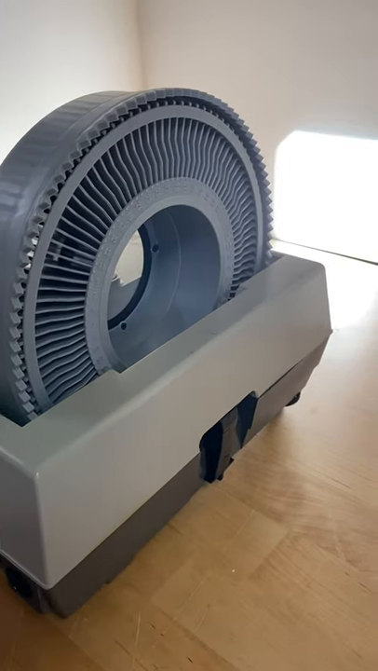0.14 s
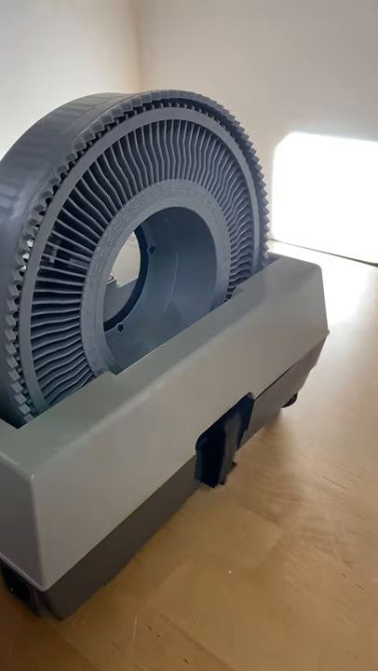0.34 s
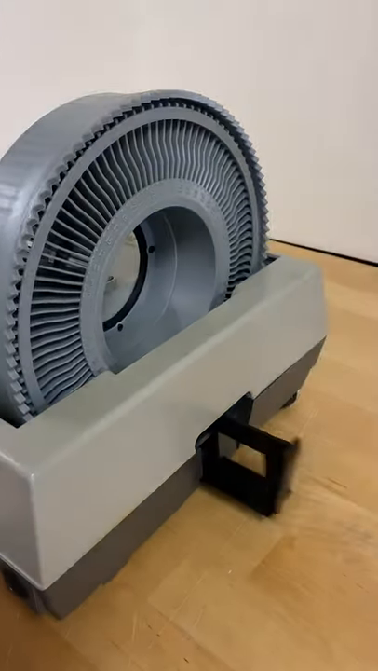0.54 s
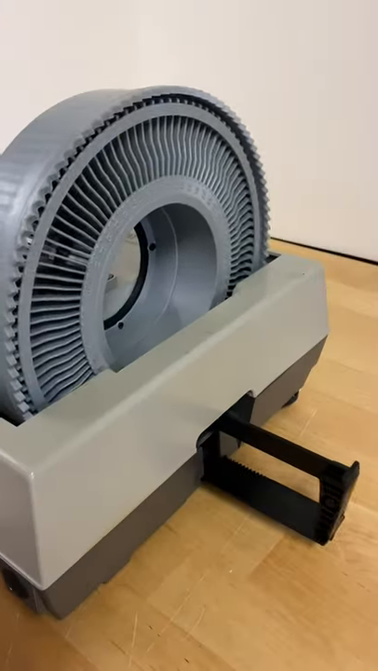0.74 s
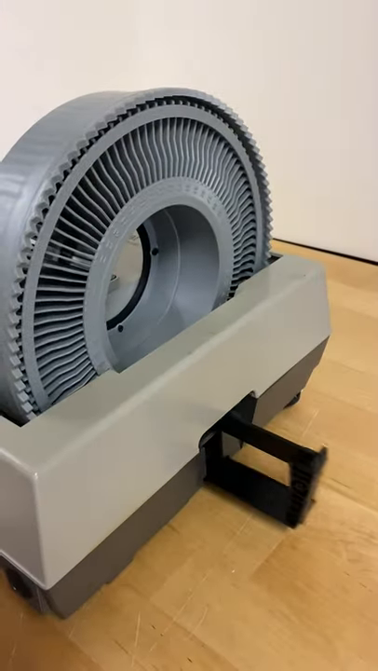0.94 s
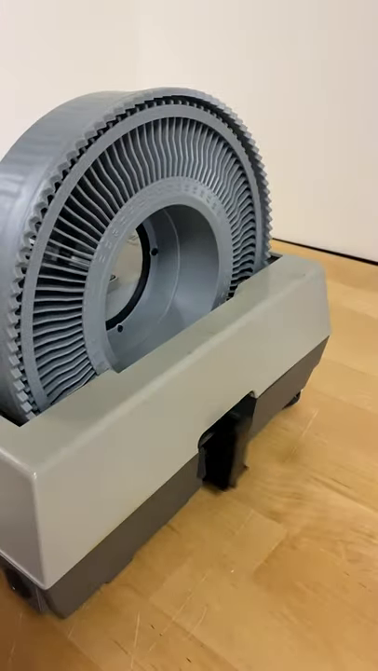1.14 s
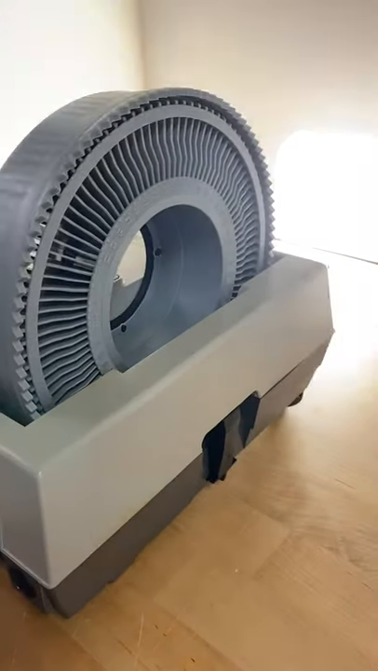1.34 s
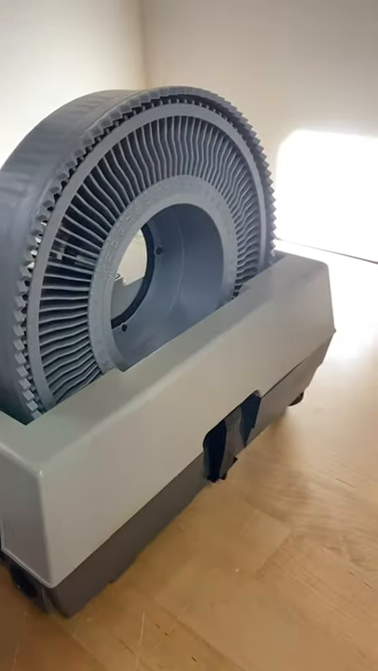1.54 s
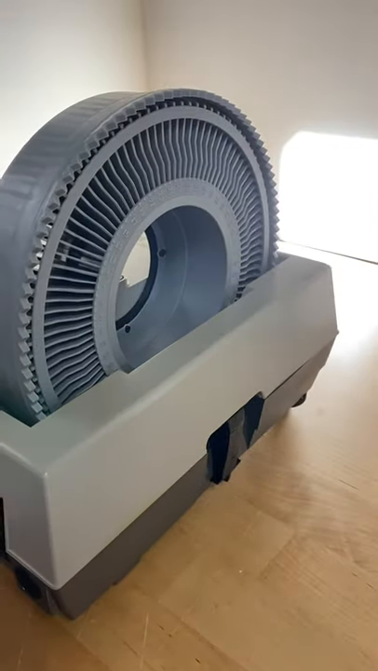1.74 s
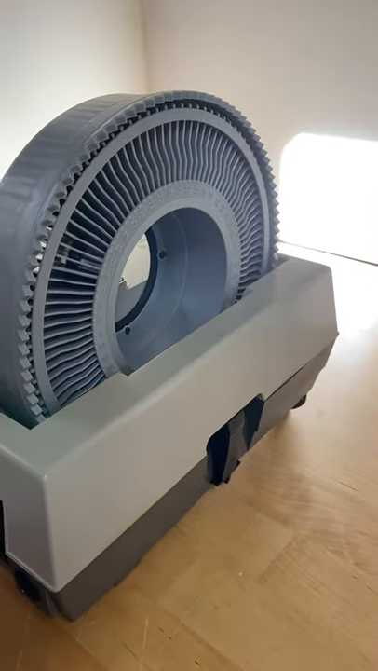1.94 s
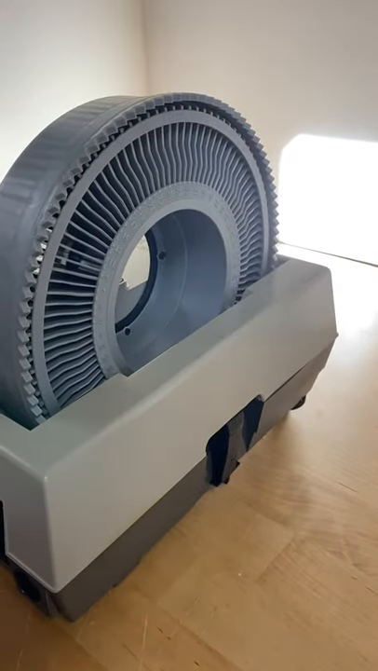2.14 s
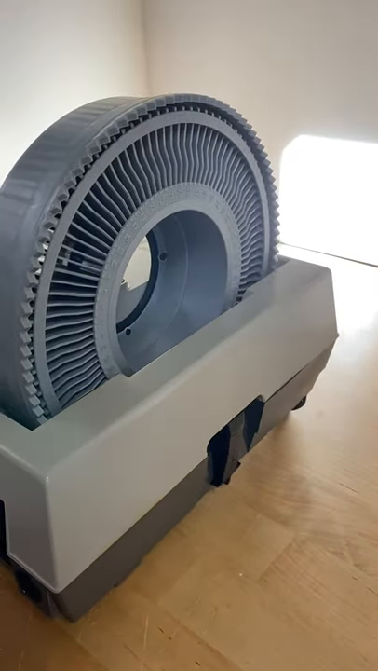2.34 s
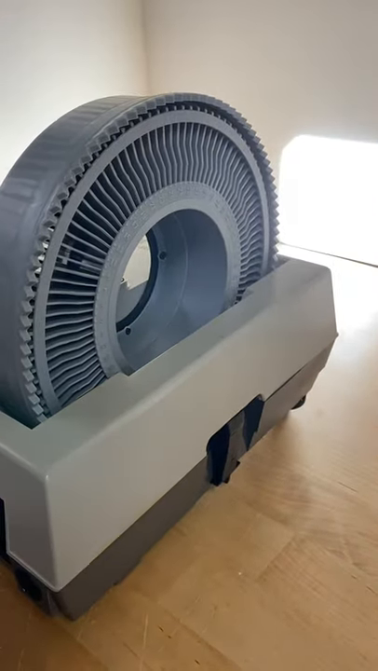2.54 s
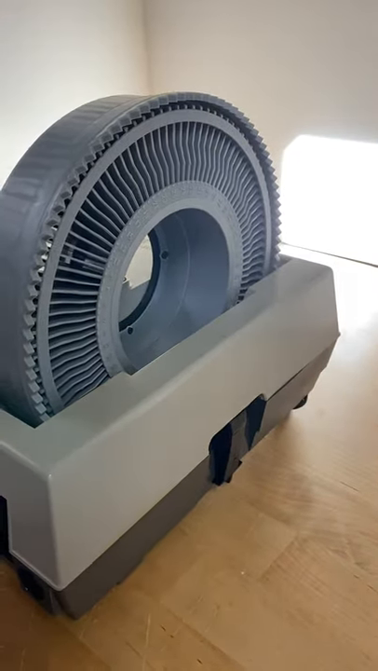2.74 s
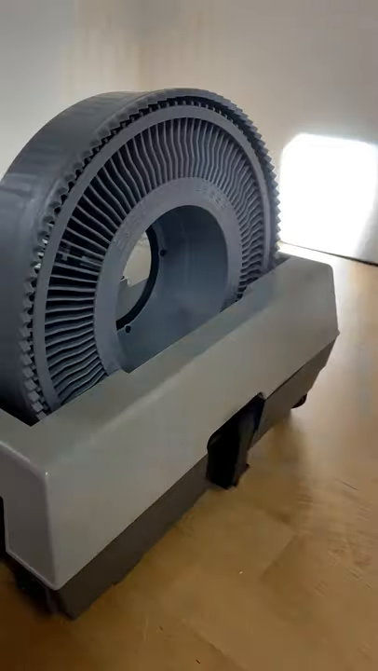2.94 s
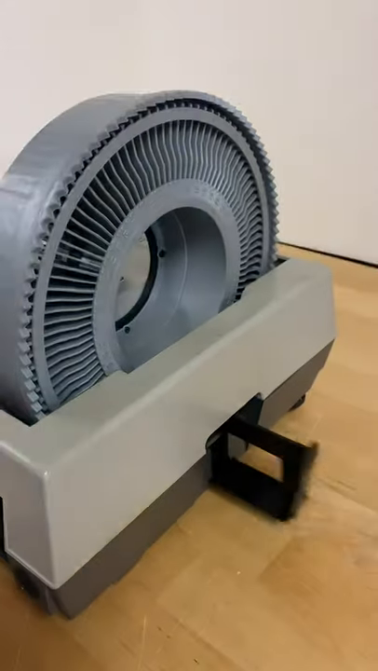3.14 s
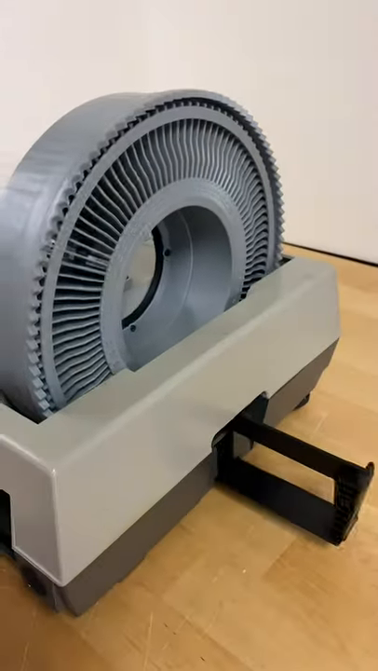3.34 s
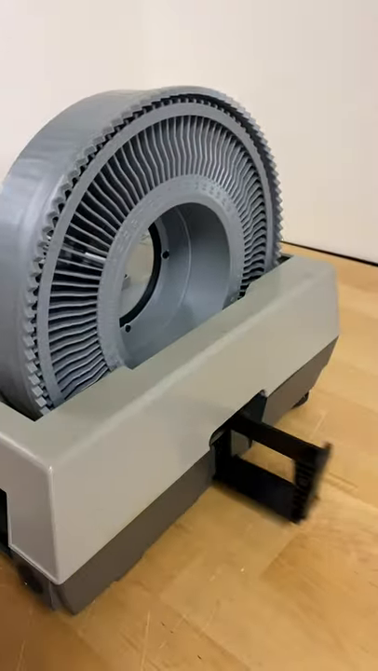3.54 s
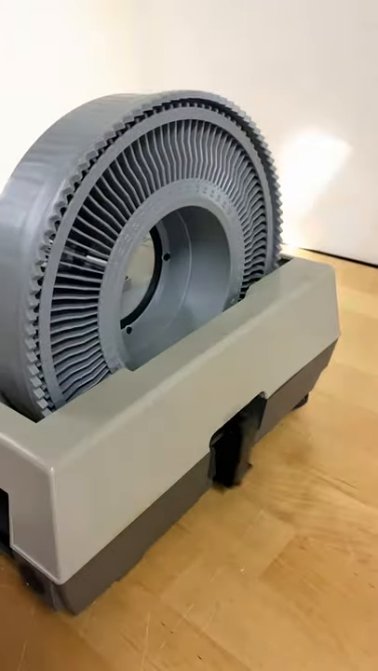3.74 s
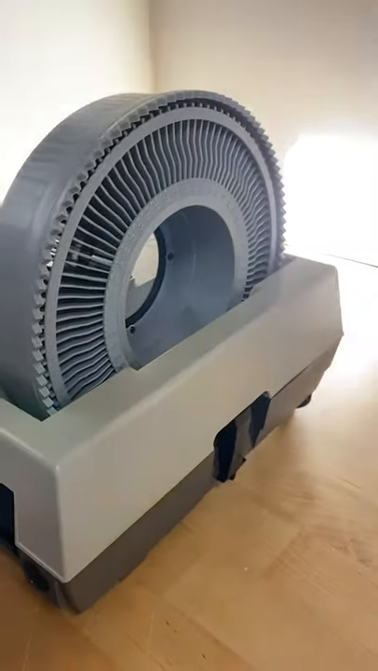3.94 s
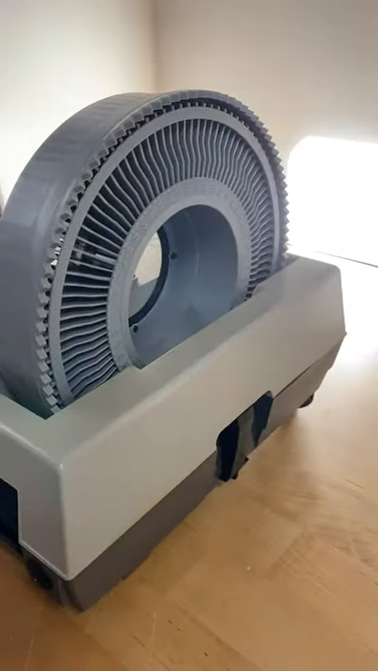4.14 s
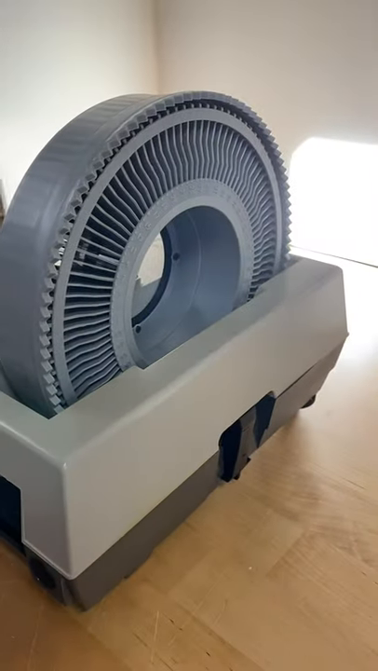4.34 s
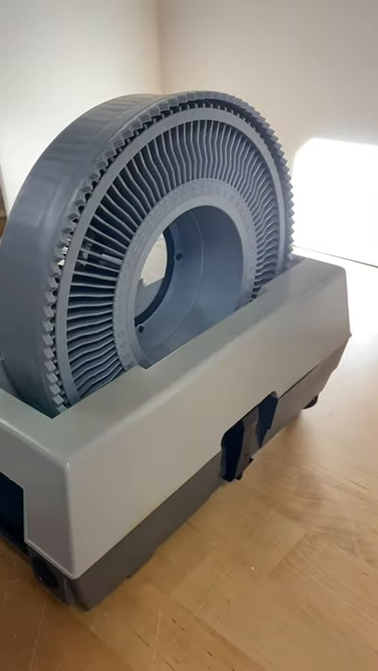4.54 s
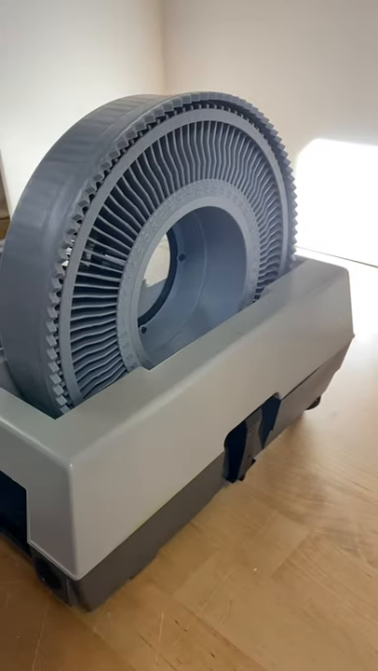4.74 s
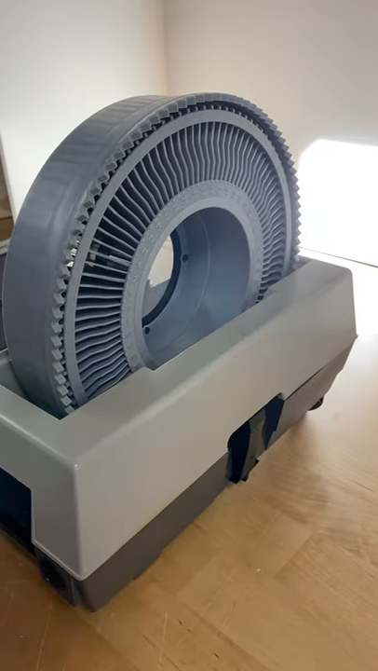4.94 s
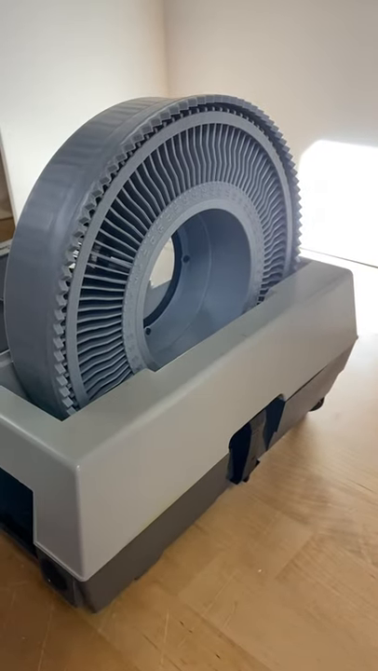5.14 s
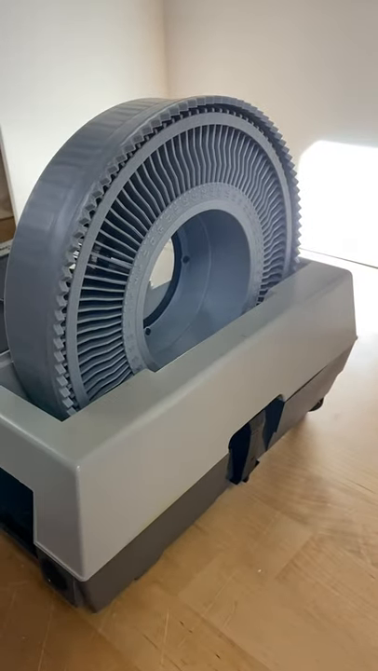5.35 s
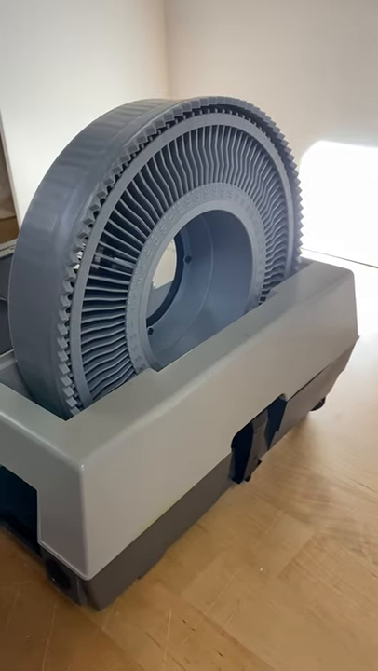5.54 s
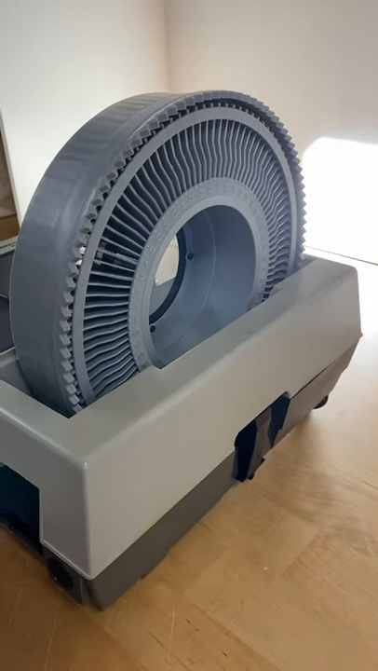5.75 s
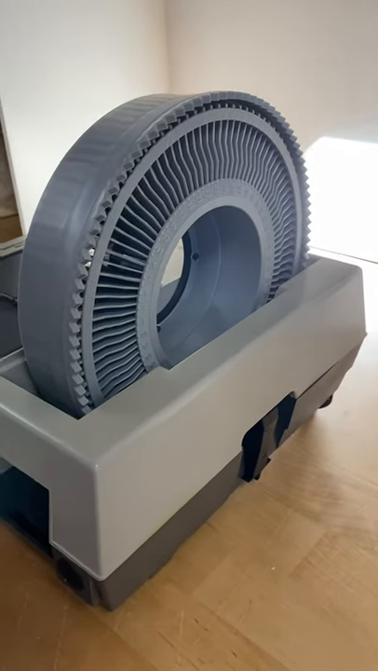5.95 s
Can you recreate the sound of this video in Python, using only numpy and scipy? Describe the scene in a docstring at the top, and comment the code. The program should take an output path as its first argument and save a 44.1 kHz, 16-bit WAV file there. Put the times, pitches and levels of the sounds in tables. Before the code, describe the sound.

Close stereo pickup of a slide projector on a wooden floor in a small room. A fan hums and blows throughout with a faint whine. Twice, about two and a half seconds apart, a geared motor whirrs, a latch snaps with a metallic ring, plastic parts rattle and scrape, the tray thuds, and the arm slams shut. Afterwards only the fan remains.

```python
"""A slide projector with a round tray hums, rushes and whines on a wooden floor: fan lines and filtered noise.
Twice a geared motor spins up, ticking and singing: gated noise and unsteady tones. Teeth catch, the latch snaps
and rings, the tray thuds and rocks the case, plastic knocks, the pawl scrapes (once it slips), the arm slams
home and the motor coasts: noise bursts through resonances, plus decaying sines. A small room answers the blows.
Two close ports hear it with different phase, level and diffuse sound."""
import sys
import numpy as np
from scipy import signal
from scipy.fft import rfft, irfft, next_fast_len
from scipy.io import wavfile
from scipy.ndimage import uniform_filter1d, map_coordinates

SR = 44100
rng = np.random.default_rng(int(sys.argv[2]) if len(sys.argv) > 2 else 0)


def wav_record(signal):
    """Record a signal, one row per channel, as 16-bit PCM in the file named by sys.argv[1]."""
    frames = np.transpose(np.atleast_2d(signal))
    bounded = np.clip(frames, -1, 1)
    # unit amplitude maps onto the largest positive 16-bit level
    quanta = np.round(bounded * 32767).astype(np.int16)
    wavfile.write(sys.argv[1], SR, quanta)


N = 264600
TIME = np.arange(N) / SR
SIZE = next_fast_len(N + SR // 2, real=True)
HZ = np.fft.rfftfreq(SIZE, 1 / SR)


def amp(db):
    """Decibels to gain."""
    return 10 ** (np.asarray(db) / 20)


def unit(x):
    """Scale to rms 1 over all rows."""
    return x / np.sqrt(np.mean(x ** 2) + 1e-20)


def along(points, hz=HZ):
    """Interpolate (f/Hz, value) points on a log frequency axis."""
    f, value = np.transpose(points)
    return np.interp(np.log(hz + 1), np.log(f + 1), value)


def wobble(knots_hz):
    """Smooth random curve through normal knots."""
    knots = rng.standard_normal(int(N * knots_hz / SR) + 4)
    return map_coordinates(knots, [TIME * knots_hz])


def filtered(x, response):
    """x through a frequency response."""
    return irfft(rfft(x, SIZE) * response, SIZE)[..., :N]


def body_db(spectrum, modes, hz=HZ):
    """Smooth spectrum lifted at each resonance."""
    lift_db = sum(db / (1 + (2 * (hz - centre) / width) ** 2) for centre, width, db in modes)
    return along(spectrum, hz) + lift_db


def causal(db):
    """Minimum-phase response with these levels: it rings only after the blow."""
    cepstrum = irfft(np.log(amp(db)))
    half = cepstrum.shape[-1] // 2
    cepstrum[..., 1:half] *= 2
    cepstrum[..., half + 1:] = 0
    return np.exp(rfft(cepstrum))


def patchy(x, db, width_hz, length_s, size=1024):
    """Drifting colour: patches of the spectrum swell and sink."""
    hz, t, z = signal.stft(x, SR, nperseg=size)
    grid = np.array(np.meshgrid(hz / width_hz, t / length_s, indexing="ij"))
    field = map_coordinates(rng.standard_normal((size // 2, size // 2)), grid, mode="mirror")
    return signal.istft(z * amp(db * field), SR, nperseg=size)[1][:, :N]


def blows(rows, colour, modes, t60_s, crack, rise_s=.001, rebound=0., size=8192):
    """Noise force with impulse and optional rebound, rung through the struck part.
    rows: t/s, level/dB, optionally treble/dB, rise/s; outputs direct and two diffuse rows."""
    t, hz = np.arange(size) / SR, np.fft.rfftfreq(size, 1 / SR)
    treble = hz ** 2 / (hz ** 2 + 1600 ** 2)
    out = np.zeros((3, N + size))
    for start_s, db, *contact in rows:
        treble_db, rise = contact or (0, rise_s)
        envelope = (1 - np.exp(-t / rise)) * amp(-60 * t / t60_s)
        force = rng.standard_normal((3, size)) * envelope
        force /= np.linalg.norm(force, axis=1, keepdims=True)
        force[0, int(rise * SR)] += crack
        force[0, int((rise + rng.uniform(.002, .005)) * SR)] += crack * rebound
        push = rfft(force)
        # flatten the force spectrum: the struck part alone sets the colour
        power = uniform_filter1d(np.abs(push) ** 2, size=61)
        uneven_db = 10 * np.log10(power + 1e-9)
        response_db = body_db(colour, modes, hz) + treble_db * treble - uneven_db
        ring = irfft(push * causal(response_db))
        ring /= np.linalg.norm(ring, axis=1, keepdims=True)
        out[:, round(start_s * SR):][:, :size] += amp(db) * ring
    return out[:, :N]


def ringing(rows, modes, gain_db, attack_s, scatter_db):
    """Each blow (t/s, level/dB, ..) starts the same decaying sines, with random phase and level scatter."""
    t = np.arange(SR // 5) / SR
    attack = 1 - np.exp(-(t / attack_s) ** 2)
    out = np.zeros((3, N))
    for start_s, db, *_ in rows:
        for hz, mode_db, t60_s in modes:
            note = np.sin(2 * np.pi * (hz * t + rng.random((3, 1)))) * attack
            peak_db = db + gain_db + mode_db + scatter_db * rng.standard_normal()
            out[:, round(start_s * SR):][:, :len(t)] += amp(peak_db - 60 * t / t60_s) * note
    return out


# slide changes: latch release t/s, drag/(s/s^2) (below 0 the motor gains speed), relative motor level/dB
CHANGES = [(0.544, 0.0, -0.16), (3.132, -0.028, 0.23)]


def each_change(steps):
    """Place cam-cycle steps (t/s after the latch, ..) in every slide change."""
    return [(latch_s + s + drag * s * s, *rest) for latch_s, drag, _ in CHANGES for s, *rest in steps]


# housing resonances: f/Hz, width/Hz, lift/dB
HOUSING = [(412, 47, 6), (810, 124, 5.5), (990, 70, 4), (1230, 70, 5), (1540, 85, 2), (1880, 110, 3),
           (3430, 230, 5.5), (5530, 370, 5)]
# arm slams home: t/s, level/dB, treble/dB, rise/s
SLAMS = [(1.1418, 9.8, 3.5, .0013), (3.7202, 9, 1.5, 0.0013)]
# slam spectrum: f/Hz, relative density/dB
SLAM_COLOUR = [(80, -21), (200, -15), (300, -7), (460, -1.5), (600, 0), (800, 0), (1050, -6.5),
               (1300, -7.5), (2200, -10), (2700, -14.5), (3400, -14.5), (4300, -14.5), (5500, -20.5),
               (8000, -29), (12500, -37), (15000, -29)]
# boom of the case: f/Hz, relative level/dB, t60/s
CASE_RING = [(411, -5, 0.053), (487, -5, 0.052), (657, -7, .045), (806, -1, .055), (1240, -9, .05),
             (3480, -14, .04)]


def slam():
    """Hard plastic crack over the boom of the case."""
    crack = blows(SLAMS, SLAM_COLOUR, HOUSING, t60_s=.042, crack=.75, rebound=.5)
    return crack + ringing(SLAMS, CASE_RING, gain_db=-23, attack_s=.0014, scatter_db=.5)


# latch lets go: t/s after the latch, level/dB
LATCH = [(0.0, 3)]
# latch spectrum: f/Hz, relative density/dB
LATCH_COLOUR = [(200, -21), (700, -6), (1200, -10), (2500, -10), (4400, -4), (6000, -3), (7500, -12),
                (9000, -8), (12000, -10.5), (16000, -14.5)]
# steel latch notes: f/Hz, relative level/dB, t60/s
LATCH_RING = [(755, 7, 0.09), (920, 2, .08), (1530, -3, .08), (1787, -2, 0.088), (2380, -7, .055),
              (2470, -4, 0.065), (3120, 1, .055), (3450, 1, .055), (4000, 0, .045), (4430, 7, 0.051),
              (4780, 4.5, .04), (5370, 3, 0.05), (5560, 4, .045), (5820, 6, 0.05), (6270, 6, 0.049)]


def latch():
    """The arm's latch snaps off its catch, rebounds and rings."""
    rows = each_change(LATCH)
    snap = blows(rows, LATCH_COLOUR, [], t60_s=.034, crack=.25, rise_s=.003, rebound=1)
    return snap + ringing(rows, LATCH_RING, gain_db=-33.5, attack_s=.003, scatter_db=1)


# pawl scrapes over the tray's teeth: t/s, level/dB
PAWL = [(0.870, -7.5), (0.877, -5.5), (0.883, -6), (3.454, -5), (3.461, -2.5), (3.469, -9.5)]
# scrape spectrum: f/Hz, relative density/dB
PAWL_COLOUR = [(200, -13.5), (400, -5), (1200, -8), (2200, -10), (3500, -9.5), (5500, -13), (8000, -8),
               (10000, -12), (16000, -19)]
# springy pawl notes: f/Hz, relative level/dB, t60/s
PAWL_RING = [(950, 1, .07), (1967, 1, .1), (2270, -6, .1), (3350, -5.5, 0.072), (4215, -2, 0.098),
             (5313, -1, .06), (6126, -8, .055), (7530, -2, 0.055), (7900, -1, .07)]
# pawl slips off a tooth: t/s, level/dB
SLIP = [(0.764, -3.5)]
# slip tick spectrum: f/Hz, relative density/dB
SLIP_COLOUR = [(200, -9), (900, -3), (2500, -6), (5200, -12), (6800, -1.5), (9000, -9), (12500, -11),
               (15000, -4)]


def pawl():
    """Short scrapes over the tray's teeth with a springy ring; one sharp tick as the pawl slips."""
    scrape = blows(PAWL, PAWL_COLOUR, [], t60_s=.044, crack=.3, rise_s=.002)
    tick = blows(SLIP, SLIP_COLOUR, [], t60_s=.028, crack=.25, rise_s=.0011)
    return scrape + tick + ringing(PAWL, PAWL_RING, gain_db=-29.5, attack_s=.003, scatter_db=3)


# plastic arm, slide and tray knock together: t/s, level/dB, treble/dB, rise/s
KNOCKS = [(0.698, -4.5, -1, .001), (0.717, 1.5, 6, .0007), (0.722, -7, 5, 0.00055),
          (0.726, -1.5, -3, .0005), (0.756, -2.5, -9, .001), (0.777, -2.5, -15, .0007),
          (0.787, -2, -3.5, .0006), (0.822, -8, -1, .001), (0.851, -4, -10, .0005), (1.087, -4, 13, .004),
          (3.287, -5.5, 5, .001), (3.304, -3, 5, 0.00084), (3.311, -1.5, 4, .001),
          (3.344, -8.5, -6, 0.00091), (3.351, -8, -4, 0.0018), (3.370, 1, -7, .0006),
          (3.381, -3.5, -6, .001), (3.412, -12, 5, .001), (3.431, -9, -13, 0.0019), (3.667, -3, 13, .003)]
# knock spectrum: f/Hz, relative density/dB
KNOCK_COLOUR = [(100, -20.5), (250, -10), (450, -1), (950, 0), (1600, -4.5), (2400, -10), (4000, -11.5),
                (6500, -17.5), (9000, -32), (16000, -34)]


def knocks():
    """Plastic contacts with a rebound, rung through the housing."""
    return blows(KNOCKS, KNOCK_COLOUR, HOUSING, t60_s=.036, crack=.55, rebound=.5)


# loose tray settles, differently each time: t/s, level/dB, treble/dB, rise/s
THUDS = [(0.603, -1, 2.5, 0.0098), (0.836, -4.5, -5, 0.0047), (3.194, -1.5, -2, .012),
         (3.385, -1, -9, .004), (3.785, -7.5, -6.5, .003)]
# thud spectrum: f/Hz, relative density/dB
THUD_COLOUR = [(50, -14), (110, -7.5), (180, -11), (400, 2), (550, -6), (900, -10), (2000, -22.5),
               (5000, -23.5), (10000, -37)]


def thuds():
    """Dull, slow-rising tray contacts, rung through the housing."""
    return blows(THUDS, THUD_COLOUR, HOUSING, t60_s=.12, crack=.077)


# tray rocks the projector on its feet: t/s after the latch, level/dB
ROCKS = [(0.073, -14.5), (0.232, -11), (0.284, -10), (0.311, -7)]
# rocking spectrum: f/Hz, relative density/dB
ROCK_COLOUR = [(25, -19), (45, -4), (75, 2), (115, 0.5), (170, -18.5), (300, -28), (1000, -70)]


def rocks():
    """Low-frequency thumps of the whole projector on its feet."""
    return blows(each_change(ROCKS), ROCK_COLOUR, [], t60_s=.11, crack=.079, rise_s=.004)


# gearbox resonances: f/Hz, width/Hz, lift/dB
GEARBOX = [(838, 66, 9.6), (954, 77, 6.6), (1115, 50, 3.3), (1200, 70, 4), (1500, 54, 4.8), (1575, 50, 6.4),
           (1933, 64, 5), (2180, 54, 4.5), (2490, 67, 7.7), (2760, 62, 3.4), (2990, 86, 6.3),
           (3170, 41, 4.5), (3290, 70, 3.7), (3510, 80, 5.1), (3670, 80, 2.5), (3950, 100, 4),
           (4110, 87, 5), (4270, 130, 5.5), (4650, 120, 3.1), (4900, 120, 4.3), (5240, 90, 4.9),
           (5670, 230, 6.4), (6490, 90, 2.5), (7000, 130, 7.8)]
# gear tooth catches while the latch is tensioned: t/s after the latch, level/dB, treble/dB, rise/s
CATCHES = [(-0.381, -18.5, -8, 0.0011), (-0.327, -15, -21, .002), (-0.251, -9.5, 1, .001),
           (-0.21, -14, -19, .002), (-0.169, -9.5, -2, .001), (-0.117, -16, -4, 0.0011)]
# catch spectrum: f/Hz, relative density/dB
CATCH_COLOUR = [(300, -19), (1200, -4.5), (2200, -4.5), (3000, -2), (4200, -0.5), (6000, -7.5), (8000, -19),
                (16000, -16)]


def catches():
    """Tooth contacts rung through the gearbox."""
    return blows(each_change(CATCHES), CATCH_COLOUR, GEARBOX, t60_s=.035, crack=.3)


# effort while tensioning the latch and pressing the slide home, eased at the cam's crests:
# t/s after the latch, extra effort/dB, width/s
LOADS = [(-0.26, 2.5, .1), (-0.04, 0.5, .04), (0.385, -2, .03), (0.585, 3, .08)]
LEAD_IN_S, SPIN_UP_S, RUN_ON_S, COAST_DB_PER_S = 0.57, 0.16, 0.607, 270


def motor_effort():
    """Motor gain: spin-up ahead of the latch, steady run, coasting, shifted by each load."""
    runs = 0
    stops = each_change([(RUN_ON_S,)])
    for (latch_s, _, motor_db), (stop_s,) in zip(CHANGES, stops):
        running_s = np.maximum(TIME - latch_s + LEAD_IN_S, 0)
        spin_up = 1 - np.exp(-(running_s / SPIN_UP_S) ** 2)
        coast_db = COAST_DB_PER_S * np.maximum(TIME - stop_s, 0)
        runs = runs + spin_up * amp(motor_db - coast_db)
    load_db = sum(db * np.exp(-((TIME - s) / width_s) ** 2) for s, db, width_s in each_change(LOADS))
    return runs * amp(load_db)


# gear train spectrum: f/Hz, relative density/dB
GEARS = [(100, -30), (220, -4.5), (420, -0.5), (650, -3), (1050, -3), (1700, -7), (2600, -14.5),
         (3600, -10), (5200, -12.5), (6000, -13), (7500, -14.5), (9000, -19.5), (11000, -21), (13500, -20),
         (16000, -21)]
# notes of the meshing gears: f/Hz, mean peak level re whirr rms/dB
GEAR_NOTES = [(840, -15), (1265, -23), (3170, -23), (3494, -17.5), (3960, -19.5), (4113, -17),
              (4245, -14.5), (4420, -20), (4860, -20), (5230, -22.5), (5540, -22), (5700, -22)]


def gears(db, shaft_hz, swing_db, teeth_hz, scatter_db, rub, snap, waver, rough):
    """Loose teeth tick, rub and sing rough notes; the level swings once per shaft turn."""
    mesh = np.cumsum(teeth_hz * (1 + .2 * wobble(90))) / SR
    ticks = np.diff(np.floor(mesh), prepend=0) * amp(scatter_db * rng.standard_normal(N))
    energy_decay_s = .0018
    energy = signal.lfilter([1], [1, -np.exp(-1 / (energy_decay_s * SR))], ticks ** 2)
    chatter = rng.standard_normal((3, N)) * np.sqrt(np.abs(energy))
    chatter[0] += snap * ticks / np.std(ticks) * np.std(chatter)
    # the shifting load favours now one resonance, now another
    contact = unit(chatter) + rub * rng.standard_normal((3, N))
    contact = patchy(contact, db=2.5, width_hz=130, length_s=.09)
    whirr = unit(filtered(contact, amp(body_db(GEARS, GEARBOX))))
    speed = 1 + waver * wobble(6)
    for hz, note_db in GEAR_NOTES:
        pitch_hz = hz * (speed + rough * wobble(400))
        level = amp(note_db + 4 * wobble(10) + 1.3 * wobble(90))
        whirr[0] += level * np.sin(2 * np.pi * np.cumsum(pitch_hz) / SR)
    swing = amp(swing_db * np.sin(2 * np.pi * shaft_hz * TIME))
    return amp(db) * motor_effort() * swing * whirr


# air through the fan: f/Hz, relative density/dB
AIR = [(20, -34.5), (45, -12), (95, -9.5), (145, -14), (190, -9.5), (280, -8.5), (490, -5.5), (610, -13.5),
       (1000, -20), (1330, -24), (2600, -23), (4200, -29), (5200, -29), (7000, -33), (8500, -39),
       (11000, -45.5), (13500, -44), (16000, -43)]
# housing cavities excited by the air: f/Hz, width/Hz, lift/dB
DUCT = [(216.3, 48, 6), (338.3, 33, 6.5), (414, 78, 6.5), (681, 65, 6), (768, 70, 5), (874, 89, 7),
        (1025, 55, 2.5), (1154, 128, 12), (1397, 63, 6.5), (1554, 48, 5.5), (1763, 134, 7.5),
        (1952, 141, 15), (2155, 114, 8.5), (2266, 81, 8), (2500, 66, 1.5), (3160, 150, 3.5), (3560, 450, 6),
        (5700, 420, 4)]


def air(db, flutter_db, throb_db):
    """Turbulent noise through the housing cavities, throbbing with each rotor turn."""
    eddies = patchy(rng.standard_normal((3, N)), db=.94, width_hz=252, length_s=.06)
    rush = unit(filtered(eddies, amp(body_db(AIR, DUCT))))
    rotor_hz = HUM[1][0]
    throb = throb_db * np.sin(2 * np.pi * rotor_hz * TIME)
    return rush * amp(db + flutter_db * wobble(22) + throb)


def whine(db):
    """Thin fan tone, wavering in pitch and level, stronger at the left port."""
    hz = 1426 + .5 * wobble(1.474) + 1.1 * wobble(14)
    tone = np.sqrt(2) * np.sin(2 * np.pi * np.cumsum(hz) / SR)
    return amp(db + wobble(7)) * tone * amp([[2], [-2]])


# fan motor and mains vibration: f/Hz, rms level/dB
HUM = [(50.95, -54.5), (56.67, -41), (103.57, -63.5), (113.34, -53), (120.05, -56), (226.68, -61.5),
       (240.1, -63), (340, -66), (764, -66.5)]


def hum():
    """Rotor unbalance and mains buzz: steady lines, slightly phase-wandering, that beat together."""
    out = 0
    for hz, db in HUM:
        phase = 2 * np.pi * (hz * TIME + rng.random()) + .06 * wobble(3.2)
        out = out + amp(db) * np.sqrt(2) * np.sin(phase)
    return out


# room decay: f/Hz, t60/s
ROOM = [(150, 0.31), (1000, 0.28), (5000, 0.12), (14000, .12)]


def room(x):
    """Walls' answer to the direct row: decaying noise tail, highs die first."""
    hz, t, z = signal.stft(rng.standard_normal((3, SR // 2)), SR, nperseg=256)
    decay = amp(-60 * t / along(ROOM, hz)[:, None])
    tail = signal.istft(z * decay, SR, nperseg=256)[1]
    return signal.fftconvolve(x[:1], tail / np.linalg.norm(tail[0]), axes=1)[:, :N]


# phase lead of the left port: f/Hz, lead/rad
LEAD = [(60, 0), (2100, -0.32), (3000, 1.19), (4200, 1.5), (5600, 2), (7200, 2.5), (8400, 3), (11500, 3),
        (13000, 4), (15000, 6.5)]
# port level difference: f/Hz, left minus right/dB
TILT = [(110, 0), (200, -0.2), (380, 1.5), (700, 5.5), (1290, 3), (2380, -0.6), (4400, -0.6), (7500, 0.1)]
# diffuse part of the power: f/Hz, share/1
DIFFUSE = [(60, .0002), (290, 0.0053), (700, 0.016), (1400, 0.059), (3100, 0.19), (5500, .25), (7200, 0.15),
           (8300, 0.0012), (11500, 0.0011), (14000, 0.42)]


def ports(x):
    """Rows (direct, diffuse left, diffuse right) to stereo, by phase lead, level tilt and diffuse share."""
    share = np.clip(along(DIFFUSE), 0, 1)
    half = np.array([[.5], [-.5]])
    balance = amp(half * along(TILT))
    lead = np.exp(1j * half * along(LEAD))
    direct = filtered(x[0], balance * np.sqrt(1 - share) * lead)
    return direct + filtered(x[1:], balance * np.sqrt(share))


def scene():
    """Changer, fan and room through both ports, plus whine and hum."""
    hits = slam() + latch() + pawl() + knocks() + thuds() + rocks() + catches()
    changer = gears(db=-41, shaft_hz=11, swing_db=.2, teeth_hz=159.9, scatter_db=1.7,
                    rub=.8, snap=.65, waver=.006, rough=.0015)
    fan = air(db=-40, flutter_db=.5, throb_db=.5)
    stereo = ports(hits + changer + fan + amp(-17.5) * room(hits))
    return stereo + whine(db=-54.5) + hum()


def record(dry):
    """Steep low-pass at the band limit."""
    top_hz = 15850
    return filtered(dry, 1 / (1 + (HZ / top_hz) ** 200))


dry = scene()
out = record(dry)
wav_record(out)
```